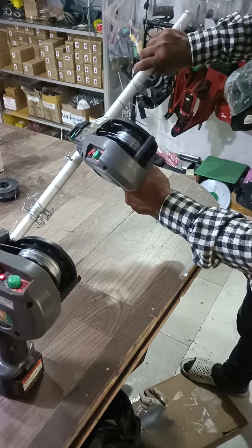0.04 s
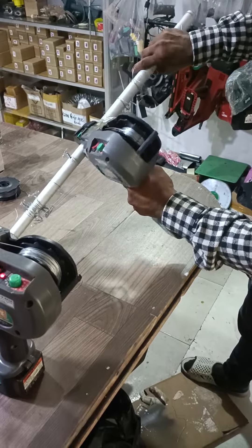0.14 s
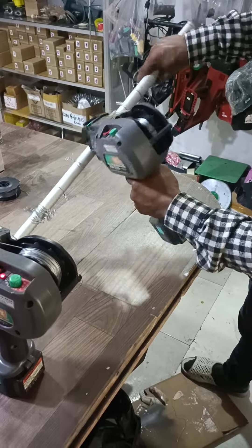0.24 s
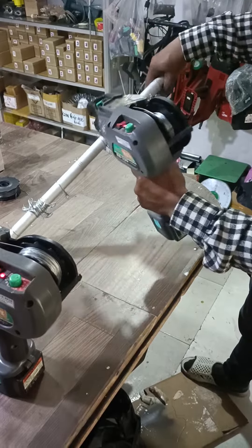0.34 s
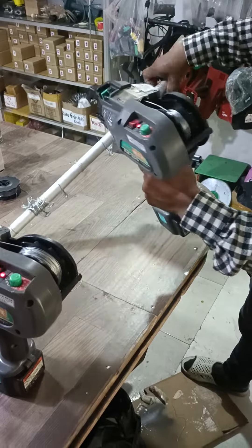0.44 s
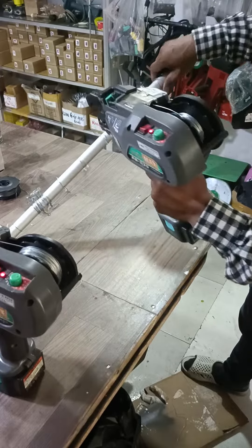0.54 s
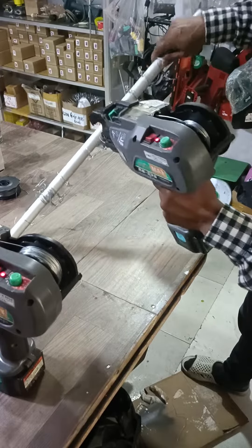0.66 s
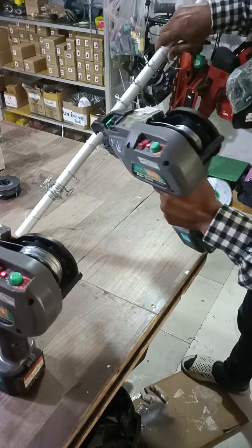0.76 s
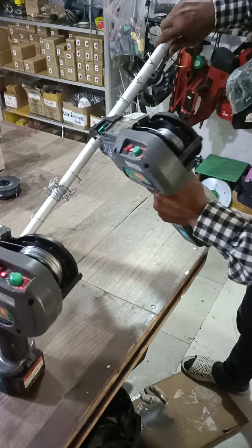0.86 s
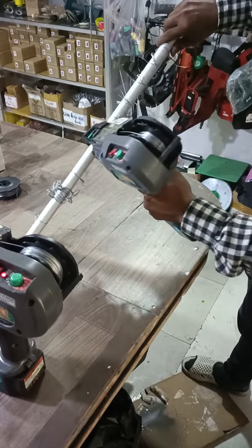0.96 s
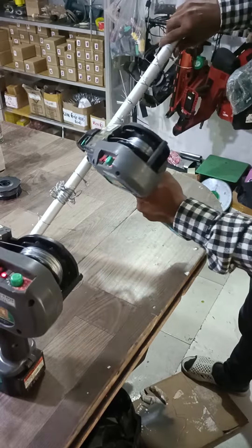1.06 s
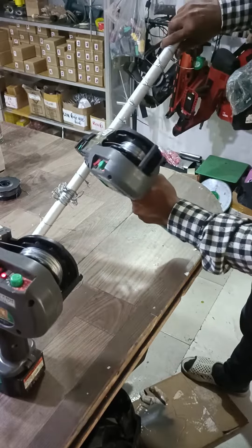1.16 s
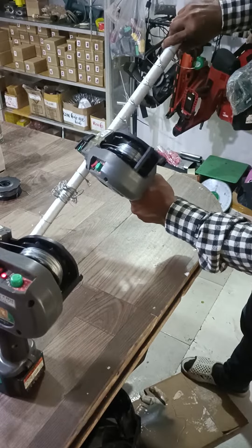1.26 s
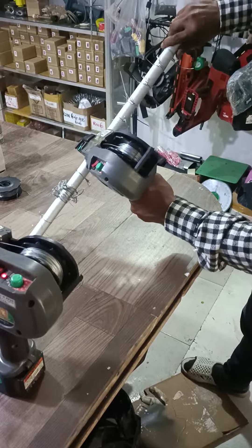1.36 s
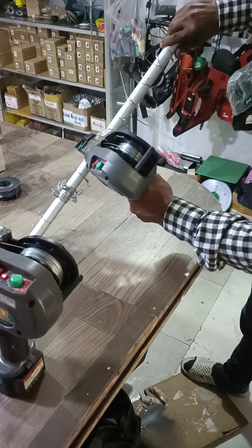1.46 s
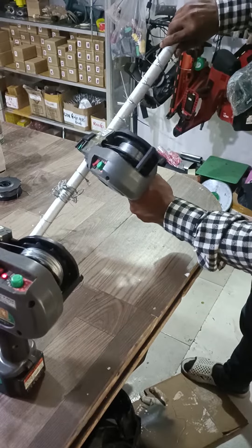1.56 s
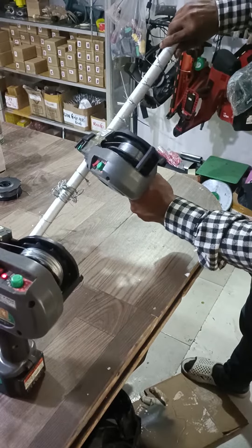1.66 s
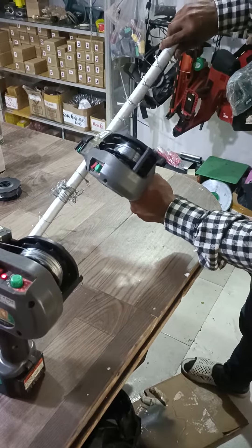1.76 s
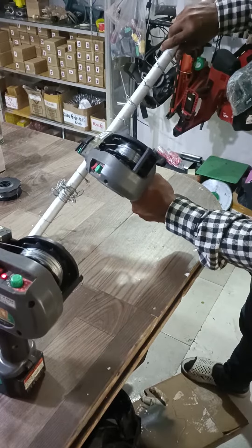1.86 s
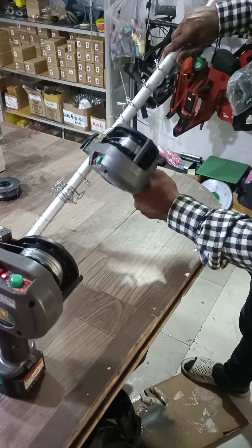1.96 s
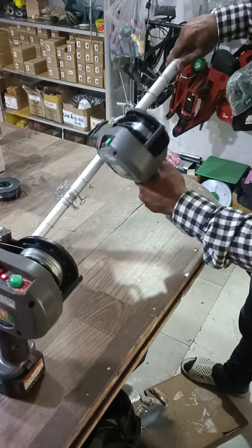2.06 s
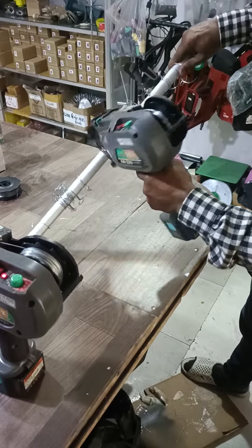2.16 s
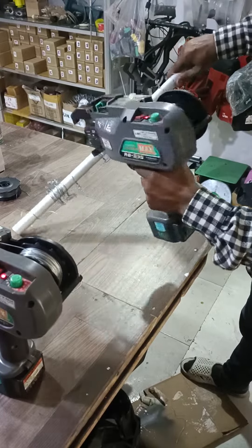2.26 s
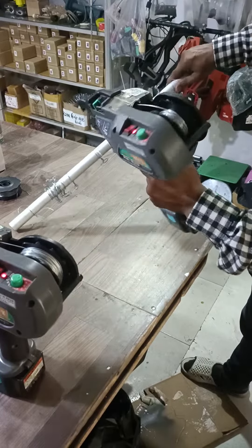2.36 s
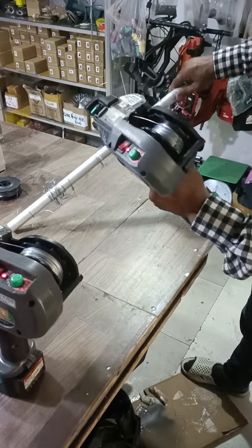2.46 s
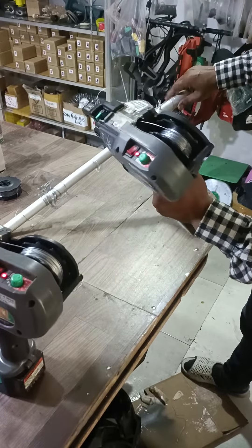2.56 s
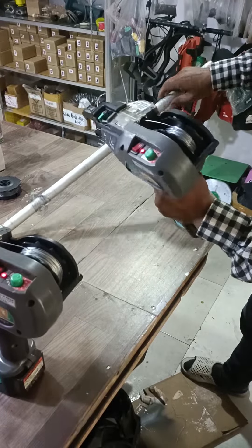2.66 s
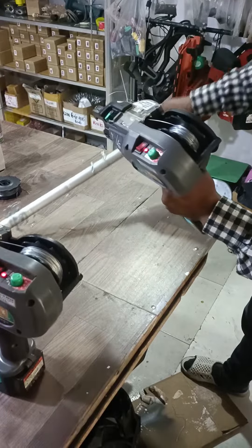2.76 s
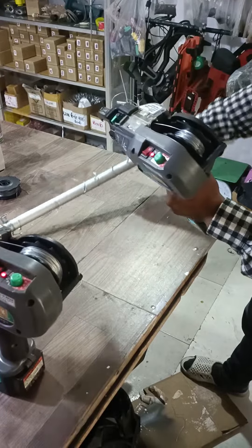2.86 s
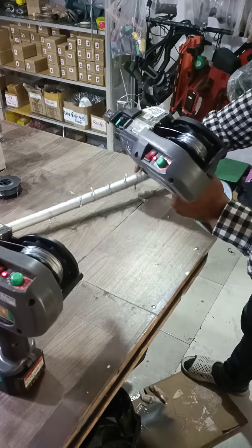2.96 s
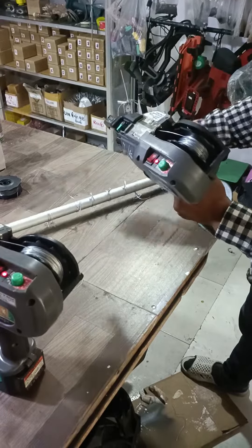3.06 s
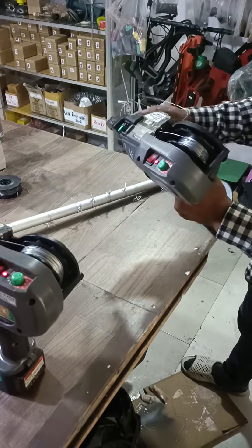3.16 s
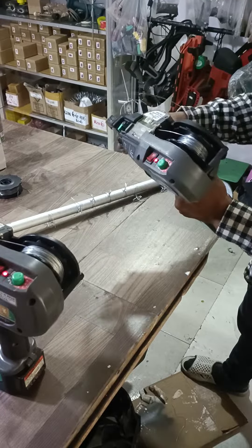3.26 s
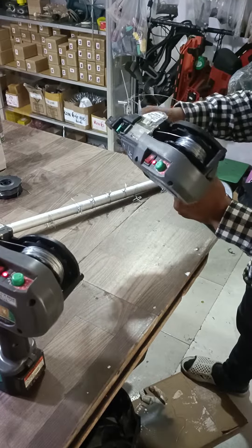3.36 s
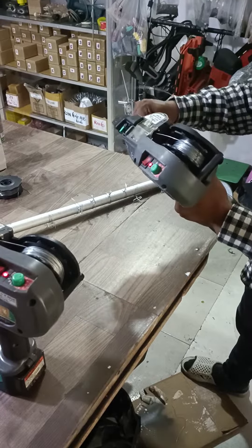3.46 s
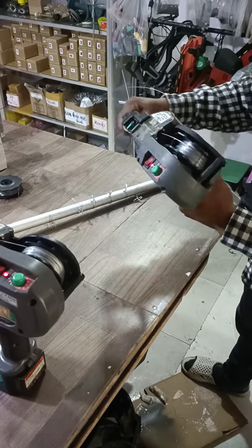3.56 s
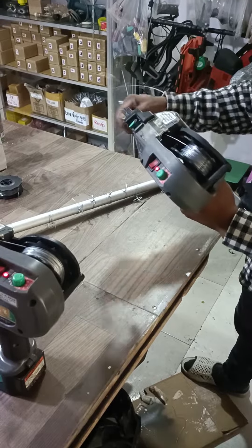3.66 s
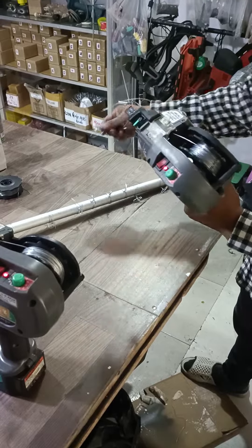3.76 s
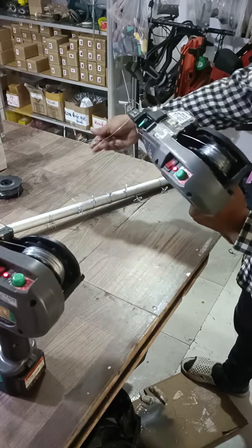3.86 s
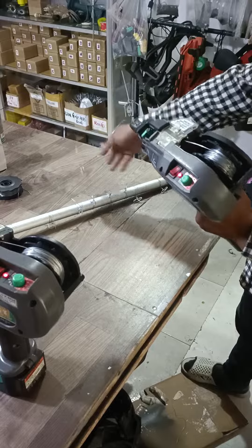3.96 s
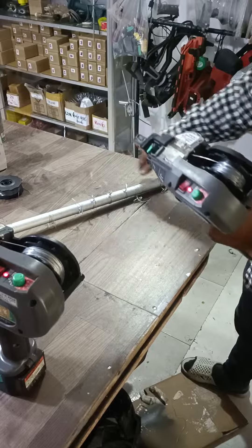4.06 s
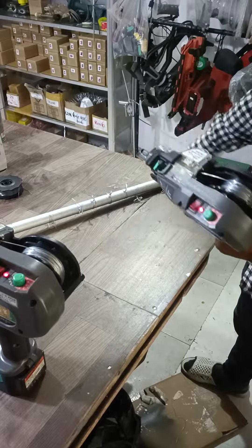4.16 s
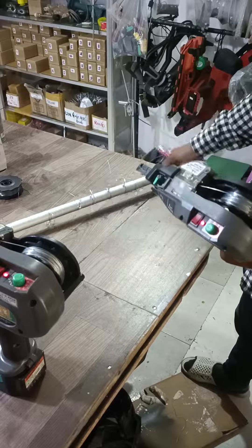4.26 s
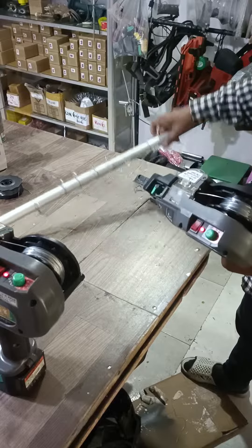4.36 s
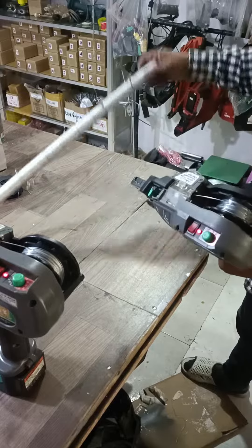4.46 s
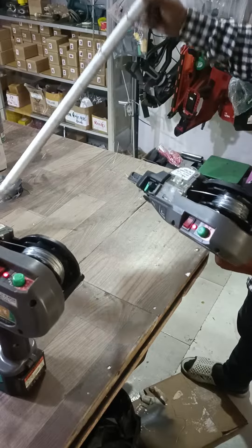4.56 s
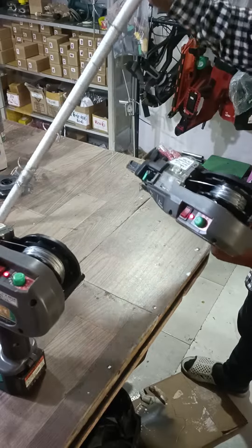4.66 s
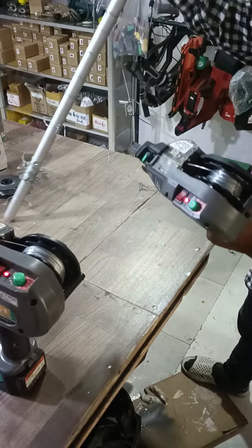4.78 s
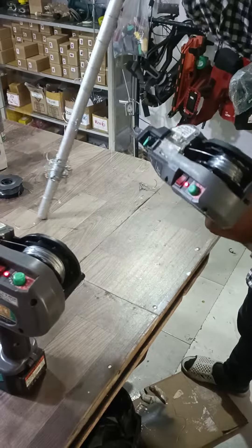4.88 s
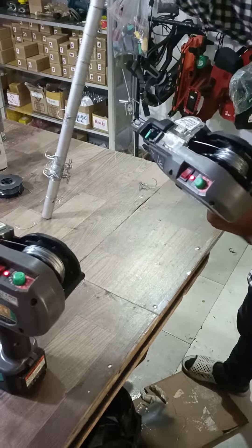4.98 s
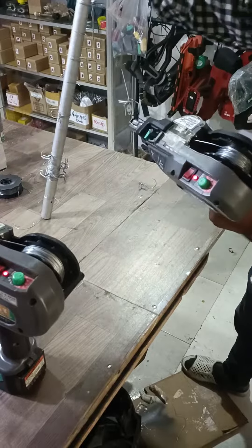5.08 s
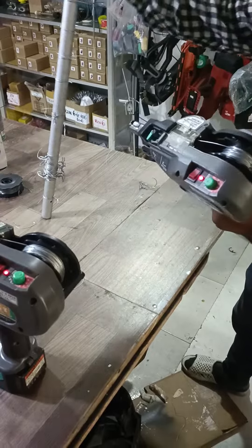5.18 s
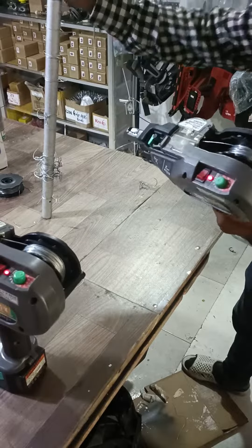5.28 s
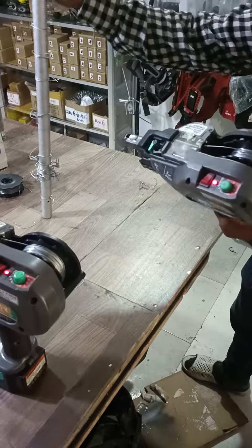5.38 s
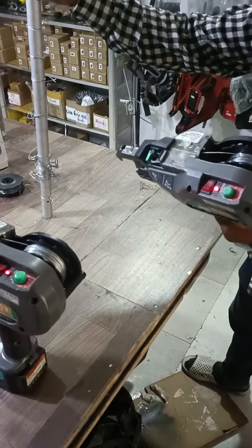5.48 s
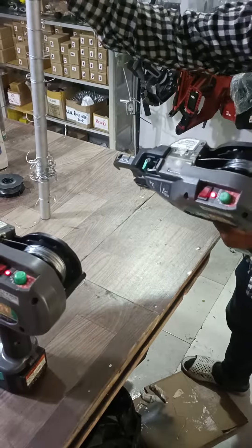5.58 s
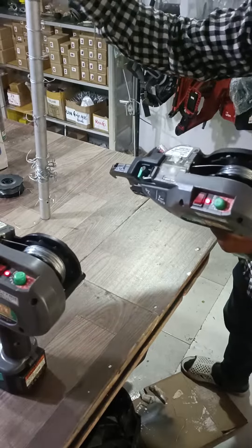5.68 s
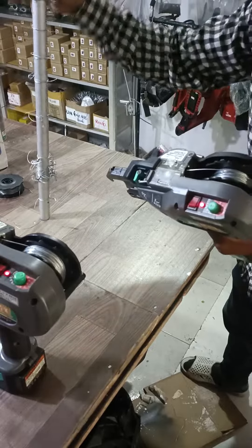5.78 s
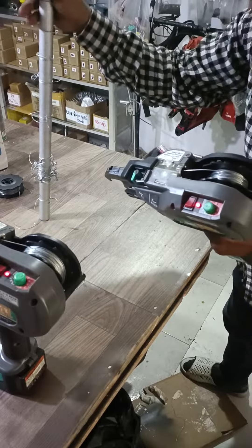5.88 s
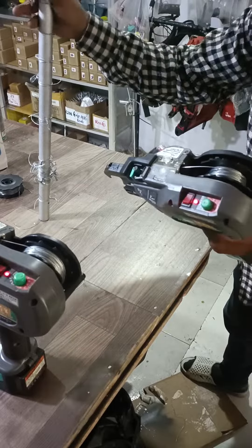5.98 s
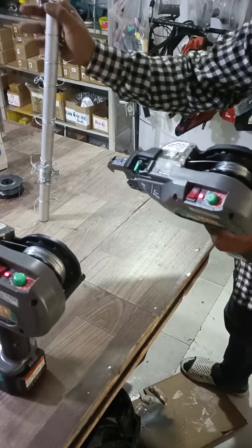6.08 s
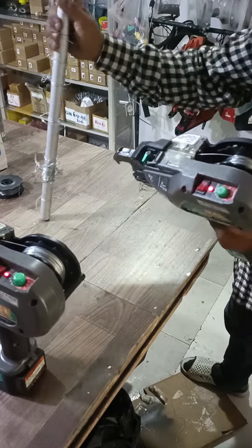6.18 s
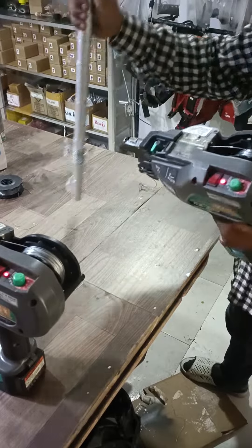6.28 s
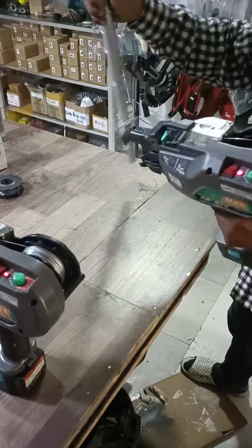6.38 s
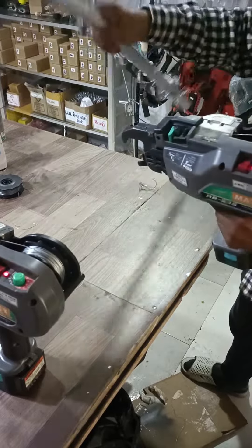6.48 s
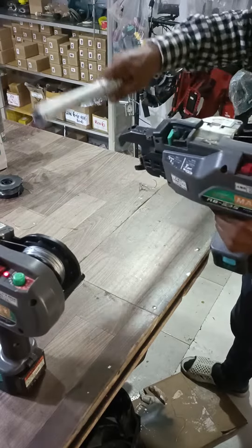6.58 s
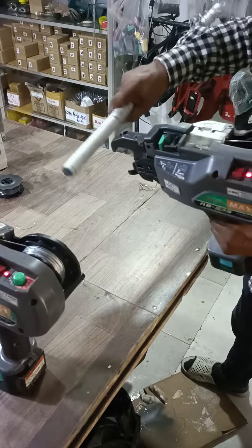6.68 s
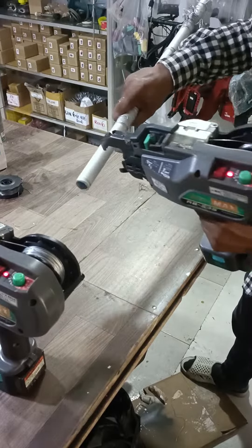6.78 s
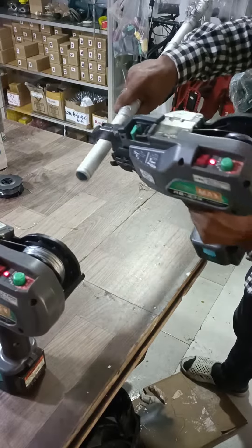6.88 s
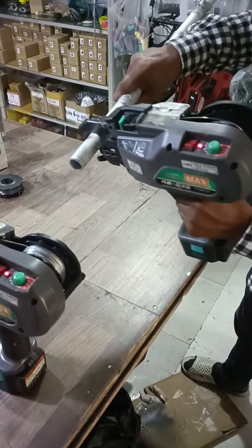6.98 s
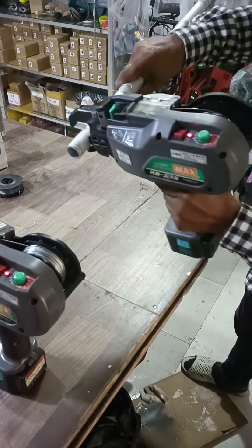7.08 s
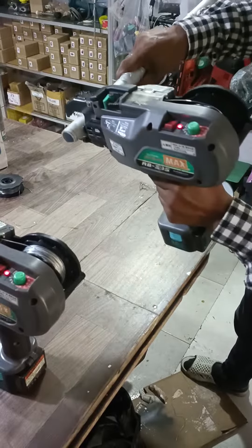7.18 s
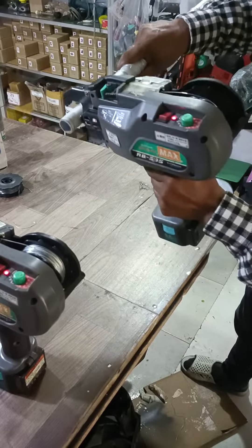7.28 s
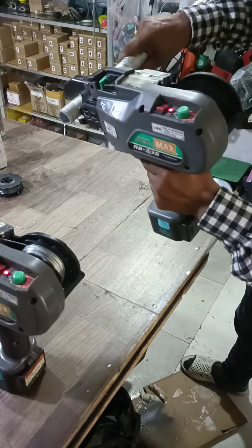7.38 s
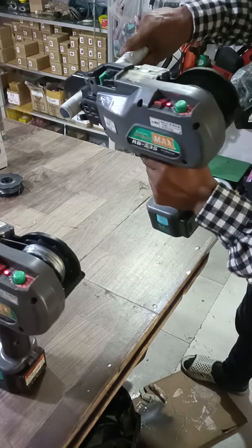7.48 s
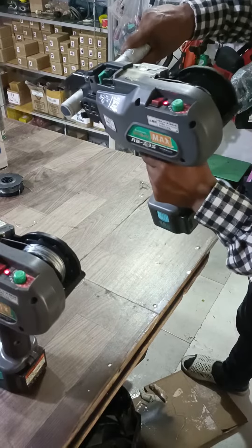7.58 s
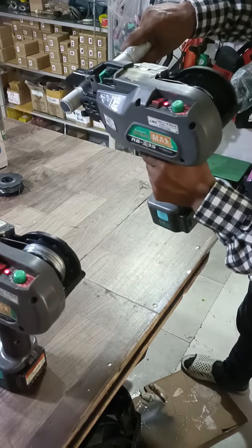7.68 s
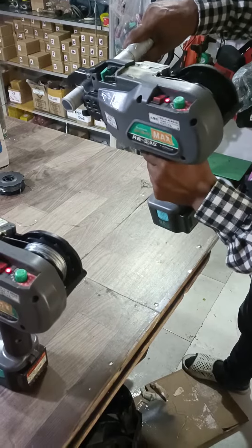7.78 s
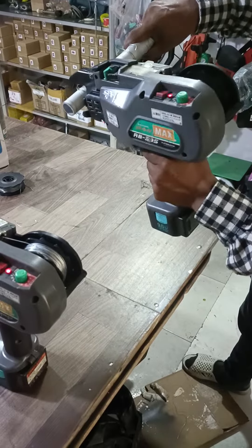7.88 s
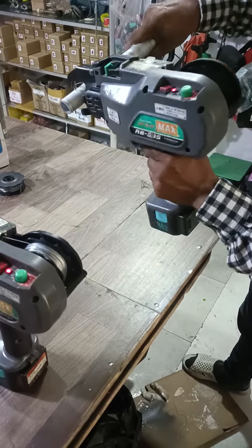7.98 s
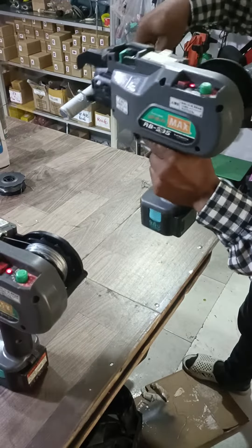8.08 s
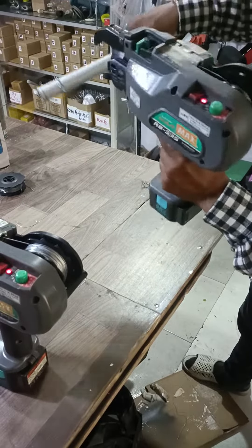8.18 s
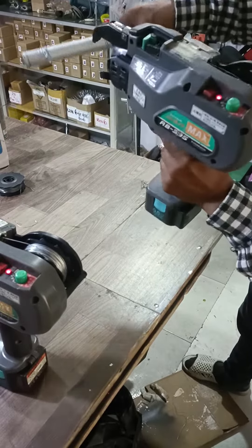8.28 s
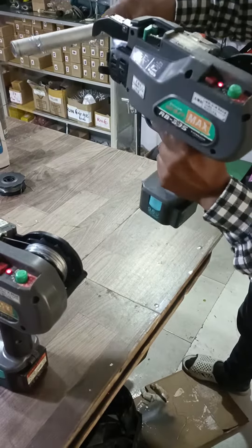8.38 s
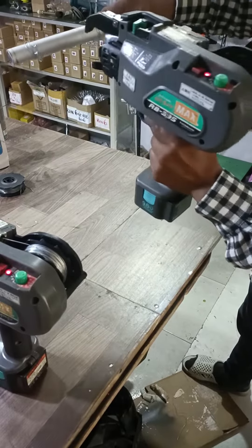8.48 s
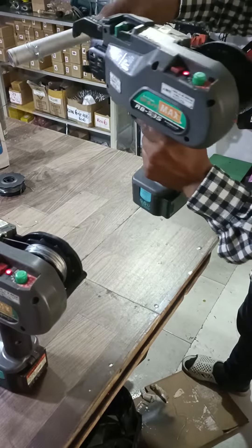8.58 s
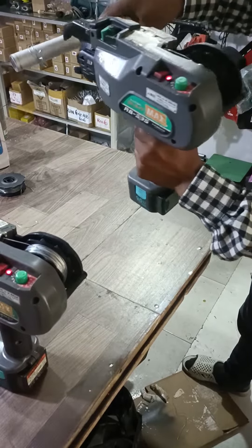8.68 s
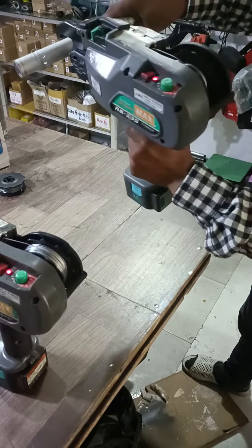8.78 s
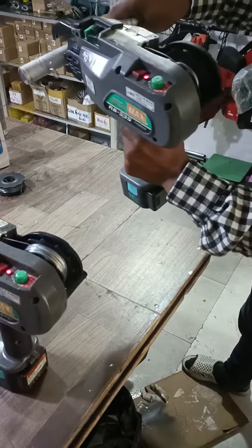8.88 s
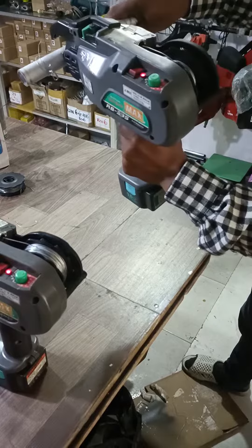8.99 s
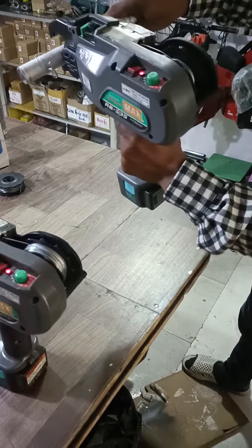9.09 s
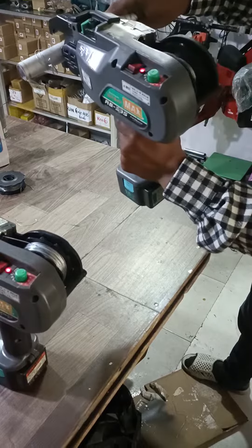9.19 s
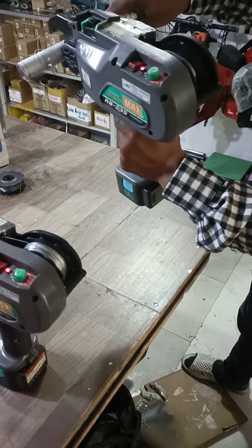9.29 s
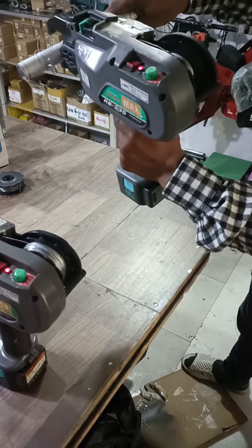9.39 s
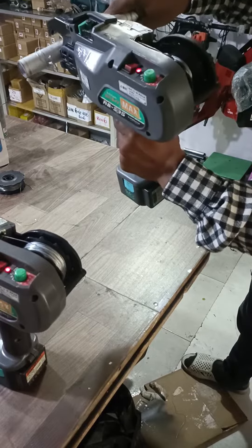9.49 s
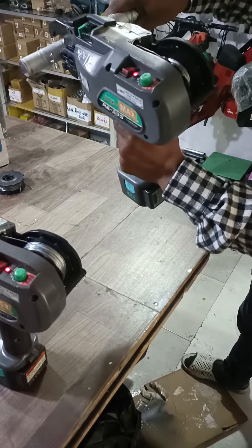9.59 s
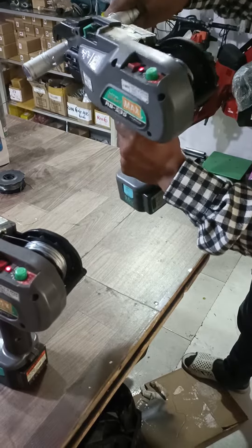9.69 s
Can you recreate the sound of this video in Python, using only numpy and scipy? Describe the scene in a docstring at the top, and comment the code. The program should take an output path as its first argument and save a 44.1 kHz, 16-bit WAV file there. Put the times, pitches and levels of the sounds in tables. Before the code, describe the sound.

A cordless wire tying tool is already running close by: a clattering gear whirr, a cutter snap and a twisting rattle that stops at about 0.6 seconds. A clack follows at 1.3, then a second burst from 1.6 to 2.3, ending with a clack and a knock. A plastic pipe scrapes softly, then drops and bounces on a wooden bench around 3.1 with a low boom. Wire scrapes and the jaws click near 3.7. From 4.1 to 5 the pipe ticks, knocks and drags with a faint falling groan. Its wire ties rustle and jingle until 6.2. The steel jaw clinks brightly at 7. A third burst runs from 7.4 to 8.2 with a thin, high whine. After a clack at 9, a similar burst runs from 9.3 to about 10. The small room hums softly throughout.

```python
"""In a small, humming stock room, a cordless rebar tier binds wire round a plastic pipe over a wooden bench.
In each cycle the gears whirr and clatter as wire is fed, the cutter snaps, and the hook twists with a
slower rattle. Between cycles the jaws click, and the pipe is dropped, dragged and stood up.
Its knocks make the bench boom and its wire ties jingle."""
import sys
import numpy as np
from scipy import signal
from scipy.fft import rfft, irfft
from scipy.io import wavfile
from scipy.ndimage import uniform_filter1d

SR = 44100
rng = np.random.default_rng(int(sys.argv[2]) if len(sys.argv) > 2 else 0)


def master(y):
    """Save y as 16-bit WAV."""
    cut = np.clip(np.atleast_2d(y).T, -1, 1)
    pcm = np.round(cut * 32767)  # scale
    wavfile.write(sys.argv[1], SR, pcm.astype(np.int16))


N = 429534
TIME = np.arange(N) / SR


def undb(db):
    """Turn decibels into a gain to multiply by."""
    return 10 ** (np.asarray(db) / 20)


def unit(x):
    """Scale a sound to an average strength (rms) of 1."""
    return x / np.sqrt(np.mean(x ** 2) + 1e-20)


def add(out, s, x):
    """Mix x into out, starting at s seconds."""
    i = max(int(s * SR), 0)
    out[i:i + len(x)] += x[:max(N - i, 0)]


def ramp(from_s, length_s):
    """Rise from 0 to 1, starting at a given time."""
    return np.clip((TIME - from_s) / length_s, 0, 1)


def band(x, lo_hz, hi_hz, order=2):
    """Keep the part of a sound between two frequencies."""
    sos = signal.butter(order, [lo_hz, min(hi_hz, SR / 2 - 1)], "band", fs=SR, output="sos")
    return signal.sosfilt(sos, x + 1e-18)


def colour(x, points, size=4096):
    """Shape the tone along a curve of (f/Hz, level/dB) points."""
    hz, db = np.transpose(points)
    grid_hz = np.arange(size // 2 + 1) * SR / size + 1
    curve_db = np.interp(np.log(grid_hz), np.log(hz), db)
    cepstrum = irfft(np.log(undb(curve_db)))
    cepstrum[1:size // 2] *= 2  # folded so that nothing rings ahead of a hit
    cepstrum[size // 2 + 1:] = 0
    return signal.oaconvolve(x, irfft(np.exp(rfft(cepstrum))))[:len(x)]


def resonate(x, peaks):
    """Boost the (f/Hz, width/Hz, level/dB) bands where an object likes to ring."""
    return x + sum(undb(db) * band(x, hz - width / 2, hz + width / 2, order=1) for hz, width, db in peaks)


def ring(modes, size=SR // 2):
    """A struck object's notes, a little different each time; each fades by 60 dB in its ring time."""
    t = np.arange(size) / SR
    return sum(undb(db + rng.normal()) * rng.choice([-1, 1]) * np.sin(2 * np.pi * hz * t)
               * np.exp(-np.log(1000) * t / ring_s) for hz, db, ring_s in modes)


def crack(decay_s, rattle_db, rattle_s, size=SR // 2):
    """A hard contact followed by a short rattle of loose parts."""
    t = np.arange(size) / SR
    return rng.standard_normal(size) * (np.exp(-t / decay_s) + undb(rattle_db) * np.exp(-t / rattle_s))


def blow(x, levels_db, size=SR // 50):
    """Give the first moments of a hit their bass, middle and treble levels."""
    parts = [band(x, lo, hi, order=3) for lo, hi in [(110, 800), (800, 5000), (5000, 21000)]]
    return sum(part * undb(db) / np.std(part[:size]) for part, db in zip(parts, levels_db))


def grit(per_s, spread_db):
    """Tiny contacts of uneven size at random moments."""
    contacts = rng.random(N) < per_s / SR
    return unit(contacts * rng.standard_normal(N) * undb(spread_db * rng.standard_normal(N)))


def swell(stroke, depth_db=15.5):
    """One rubbing stroke grows to its peak and dies away."""
    start, rise_s, fall_s, db = stroke
    off_peak = 1 - ramp(start, rise_s) + ramp(start + rise_s, fall_s)
    return uniform_filter1d(undb(db - depth_db * off_peak ** 2) * (off_peak < 1), 128)


def scrape(strokes, tone, per_s, gain_db, flutter_db):
    """Two surfaces stick and slip unevenly, in grains that take on the rubbed object's tone."""
    catching = undb(flutter_db * unit(band(rng.standard_normal(N), 7.8, 60)))
    grains = unit(colour(grit(per_s, spread_db=2.4) * catching, tone))
    return grains * undb(gain_db) * sum(map(swell, strokes))


def glides(notes, width_hz):
    """Steady rubbing sings rough, sliding notes."""
    out = np.zeros(N)
    for start, end, from_hz, to_hz, db in notes:
        n = max(int((end - start) * SR), 100)
        noise = rng.standard_normal(n) + 1j * rng.standard_normal(n)
        rough = signal.lfilter(*signal.butter(2, width_hz, fs=SR), noise)
        note = np.real(rough * np.exp(2j * np.pi * np.cumsum(np.linspace(from_hz, to_hz, n)) / SR))
        add(out, start, unit(note) * signal.windows.tukey(n, .5) * undb(db))
    return out


def place(x, lag, pan_db):
    """Make a left and right pair: the right is lag samples later and pan_db quieter."""
    return np.array([x * undb(pan_db / 2), np.roll(x, lag) * undb(-pan_db / 2)])


# tone of the room's rumble: f/Hz, level/dB
RUMBLE_TONE = [(15, -61), (25, -26.5), (69, -20.5), (109, -7), (191, -11), (224, -10), (278, -8.5),
               (318, -5.5), (501, -17.5), (769, -14), (856, -14), (927, -19), (1810, -25.5), (2300, -28),
               (15000, -52.5)]
# how loud the hum is over time: t/s, level/dB
HUM_LEVELS = [(0, -61), (1.4, -66.5), (2.8, -54.5), (5.7, -53), (8.6, -76)]
def background(rumble_db=-52.5):
    """The room rumbles softly, with a wavering hum in two low bands."""
    rumble = np.array([unit(colour(rng.standard_normal(N), RUMBLE_TONE)) for _ in range(2)])
    hum = sum(undb(db) * unit(band(rng.standard_normal(N), hz - width / 2, hz + width / 2))
              for hz, width, db in [(118, 30, 0), (195, 70, -3)])
    return rumble * undb(rumble_db) + hum * undb(np.interp(TIME, *np.transpose(HUM_LEVELS)))


# how long the room rings: f/Hz, ring time/s
ROOM_RING = [(150, 0.01), (500, 0.42), (1500, 0.3744), (4000, 0.4627), (9000, 0.35), (15000, 0.44)]
def room(x, early_db=-5, early_s=.0031, tail_db=-4, build_s=.0026, size=SR * 3 // 4):
    """Sound bounces quickly off the bench, then scatters among the shelves into a fading tail."""
    t = np.arange(size) / SR
    edges_hz = np.geomspace(60, 20000, 9)
    tail = np.zeros(size)
    for lo, hi in zip(edges_hz, edges_hz[1:]):
        ring_s = np.interp(np.sqrt(lo * hi), *np.transpose(ROOM_RING))
        tail += band(rng.standard_normal(size), lo, hi) * np.exp(-np.log(1000) * t / ring_s)
    tail *= 1 - np.exp(-t / build_s)
    early = rng.standard_normal(size) * (rng.random(size) < .15) * np.exp(-t / early_s)
    echoes = (undb(early_db) * unit(early) + undb(tail_db) * unit(tail)) / np.sqrt(size)
    return signal.oaconvolve(x, echoes)[:N]


REBOUND_S = .0095  # a tick or knock touches again, more weakly, this much later
# ticks of the wire ties: t/s, peak level/dB
TIE_TICKS = [(1.0484, -35), (3.4212, -35), (4.1133, -30.5), (4.19, -28.5), (4.2632, -25), (4.279, -27),
             (4.5965, -27.5), (5.245, -29.5), (5.9407, -21), (6.0813, -32), (6.1572, -17)]
# ties rubbing on the pipe: start/s, rise/s, fall/s, level/dB
TIE_RUBS = [(1.086, 0.017, .04, -50), (3.418, .014, .01, -45), (5.243, .07, .075, -34),
            (5.708, .008, 0.043, -49), (5.845, .03, 0.069, -51), (5.937, 0.021, 0.031, -41.5),
            (6.143, 0.012, .018, -36), (6.16, .02, 0.046, -48)]
# tone of the thin wire: f/Hz, level/dB
TIE_TONE = [(880, -60), (1500, -15.5), (1620, -17), (2080, -23.5), (2360, -14), (3270, -19.5), (3680, -2.5),
            (4100, -23.5), (4700, -3), (5350, -11.5), (6080, -3.5), (9470, -2.5), (15800, -18)]
def wire_ties(tick_db=-2, rebound_db=-8, rub_db=-2):
    """Loose wire ties tick, bounce and rub on the pipe."""
    ticks = np.zeros(N)
    for s, db in TIE_TICKS:
        for late_s, contact_db in [(0, tick_db), (REBOUND_S, rebound_db)]:
            tick = colour(crack(decay_s=.0017, rattle_db=-17.5, rattle_s=.011), TIE_TONE)
            add(ticks, s + late_s, tick / np.abs(tick).max() * undb(db + contact_db))
    rubbing = unit(colour(grit(per_s=2200, spread_db=2.5), TIE_TONE))
    return ticks + rubbing * undb(rub_db) * sum(map(swell, TIE_RUBS))


def tie_jingle(pipe, ring_hz=8520, width_hz=400, gain_db=-44, fade_s=.04):
    """Whatever shakes the pipe sets its wire ties ringing high; their slack limits how hard."""
    keep = np.exp(-1 / (fade_s * SR))
    shaking = np.sqrt(signal.lfilter([1 - keep], [1, -keep], np.abs(pipe)))
    ringing = unit(band(rng.standard_normal(N), ring_hz - width_hz / 2, ring_hz + width_hz / 2))
    return ringing * shaking * undb(gain_db)


# drags along the bench: start/s, rise/s, fall/s, level/dB
PIPE_DRAGS = [(2.72, .12, 0.11, -45), (2.968, 0.0089, 0.011, -47), (4.56, 0.11, .13, -39.5),
              (4.925, .01, 0.064, -39)]
# tone of plastic on wood: f/Hz, level/dB
DRAG_TONE = [(120, -27), (220, 0.5), (450, -8), (800, -9), (1500, -4.5), (2500, -8.5), (4200, -10.5),
             (7500, -16), (15000, -32)]
# where the dragged pipe rings: f/Hz, width/Hz, level/dB
DRAG_PEAKS = [(787, 43, -1), (1150, 87, -11), (1540, 150, -2), (2450, 240, 5.5), (3560, 120, 5)]
def pipe_drag():
    """The pipe scrapes over the wood, which makes it ring."""
    return resonate(scrape(PIPE_DRAGS, DRAG_TONE, per_s=2400, gain_db=-2, flutter_db=1.5), DRAG_PEAKS)


# groans of the pipe: start/s, end/s, first f/Hz, last f/Hz, level/dB
PIPE_GROANS = [(4.63, 4.74, 2410, 1704, -50), (4.69, 4.81, 1150, 598, -43)]
def pipe_groan():
    """The dragged pipe groans lower as it tips upright."""
    return glides(PIPE_GROANS, width_hz=220)


# knocks on the bench: t/s, bass/dB, middle/dB, treble/dB
PIPE_KNOCKS = [(2.273, -26, -21, -27), (3.0964, -16, -15, -31.5), (3.204, -23, -27.5, -43),
               (4.243, -47, -55, -56), (4.433, -31.5, -37.5, -49), (4.921, -38.5, -35, -42)]
# tone of a knock: f/Hz, level/dB
KNOCK_TONE = [(60, -18.5), (220, -7), (350, -10), (490, 2.5), (780, -11), (880, -12.5), (1050, -7),
              (1500, -16.5), (2300, -13.5), (5400, -27.5), (8400, -32), (15800, -40.5)]
# notes of the struck pipe and bench: f/Hz, level/dB, ring time/s
KNOCK_NOTES = [(170, -8, 0.22), (231, -1.5, 0.39), (415, -5, .12), (468, 1, 0.12), (585, -2, .14),
               (766, -5, 0.14), (1060, -4, 0.22), (1150, -5.5, 0.21), (1245, -4.5, 0.11), (1605, -13, .12),
               (2120, -12, 0.24), (2295, -11.5, 0.32), (2650, -11, 0.28)]
def pipe_knocks(ring_db=-8, first_db=(-1, -1, 0), rebound_db=(-7, -16, -3)):
    """The pipe hits the bench and bounces, and both ring."""
    out = np.zeros(N)
    for s, *levels in PIPE_KNOCKS:
        for late_s, contact_db in [(0, first_db), (REBOUND_S, rebound_db)]:
            contact = unit(colour(crack(decay_s=.0021, rattle_db=-12.5, rattle_s=.022), KNOCK_TONE))
            knock = contact + undb(ring_db) * unit(ring(KNOCK_NOTES))
            add(out, s + late_s, blow(knock, np.add(levels, contact_db)))
    return out


# booms of the bench top: t/s, level/dB
BENCH_BOOMS = [(0.552, -39), (1.285, -38.5), (2.276, -33.5), (3.098, -35.5), (3.204, -38.5), (4.436, -31.5),
               (4.921, -46)]
# its low notes: f/Hz, level/dB, ring time/s
BENCH_NOTES = [(76, -8, 0.17), (90, 0, .22), (99, 6.5, 0.25), (124, -7.5, 0.24)]
def bench_booms(rise_s=.016):
    """The heavy bench top is slow to start booming after a hit."""
    out = np.zeros(N)
    for s, db in BENCH_BOOMS:
        boom = ring(BENCH_NOTES)
        add(out, s, undb(db) * boom * (1 - np.exp(-TIME[:len(boom)] / rise_s)))
    return out


# slides of the wire: start/s, rise/s, fall/s, level/dB
WIRE_SLIDES = [(1.24, .033, .005, -45), (3.585, .075, .014, -28), (4.135, 0.0052, 0.042, -37),
               (4.26, .02, 0.03, -40)]
# tone of the sliding wire: f/Hz, level/dB
SLIDE_TONE = [(410, -61.5), (700, -23), (1180, -20), (1630, -10), (2580, -10.5), (3260, -10), (4120, -5.5),
              (6260, -5), (7810, -16.5), (10500, -15.5), (15800, -17)]
def wire_slides():
    """Wire slides in the tool's jaws with a fine scrape."""
    return scrape(WIRE_SLIDES, SLIDE_TONE, per_s=8100, gain_db=-1, flutter_db=2)


# taps of the jaw: t/s, level/dB
JAW_HITS = [(7.0235, -15.5)]
# notes of the jaw: f/Hz, level/dB, ring time/s
JAW_NOTES = [(1600, -12.5, 0.1), (1730, -10.5, .035), (2105, -8, 0.03), (3305, -0.5, 0.098),
             (3370, -11.5, 0.13), (8500, -26.5, 0.26)]
def jaw_ring(contact_db=-5):
    """The steel jaw rings when it meets the pipe."""
    out = np.zeros(N)
    for s, db in JAW_HITS:
        contact = band(crack(decay_s=.0025, rattle_db=-12, rattle_s=.012), 1400, 9000, order=1)
        add(out, s, undb(db) * (ring(JAW_NOTES) + undb(contact_db) * contact))
    return out


SWITCH_S = .012  # the drive fades in or out over this time
CURL_AFTER_S, SPEED_UP_S = .2, .17  # after the trigger, the wire curls round the jaws and the feed speeds up
# tying cycles: trigger/s, wire caught/s, feed ends/s, cut/s, twist ends/s, feed rate/Hz, twist rate/Hz,
# twist slowing/(Hz per s), feed level/dB, twist level/dB, tool turned side-on/(0 or 1)
TYING_CYCLES = [(-.235, -.185, .215, .3, .568, 80, 88, 120, -19.5, -25, 0),
                (1.582, 1.632, 2.028, 2.145, 2.335, 77, 120, 85, -20, -20, 0),
                (7.399, 7.42, 7.887, 7.95, 8.182, 77.5, 88, 55, -20, -24, 1),
                (9.241, 9.289, 9.745, 9.8, 10.03, 85, 88, 55, -20, -24, 1)]
def running_cycle():
    """The columns of the cycle under way at each moment; it takes over just before its trigger."""
    rows = np.array(TYING_CYCLES)
    return rows[np.searchsorted(rows[1:, 0] - SWITCH_S, TIME)].T


def recoil(thump_db=-46, side_on_db=-12, decay_s=.012):
    """Each cut jolts the whole tool with a dull thump, weaker when it is side-on."""
    out = np.zeros(N)
    t = TIME[:SR // 10]
    for _, _, _, cut, *_, side_on in TYING_CYCLES:
        thump = unit(band(rng.standard_normal(len(t)) * np.exp(-t / decay_s), 55, 230))
        add(out, cut, thump * undb(thump_db + side_on_db * side_on))
    return out


# clacks of the jaws: t/s, bass/dB, middle/dB, treble/dB, rattle/dB
JAW_CLACKS = [(.496, -52, -22, -22, -30), (1.2764, -37, -27, -34.5, -23), (1.424, -62, -47, -54, -28),
              (2.291, -33, -21, -19, -23), (3.553, -57.5, -43, -50, -26), (3.675, -38, -20.5, -24, -18),
              (4.13, -58, -35.5, -36.5, -31), (7.119, -45, -23, -30.5, -23), (8.982, -38, -25.5, -37, -22)]
# the cutter's snap: bass/dB, middle/dB, treble/dB, rattle/dB
CUTTER_SNAP = (-40, -23, -21, -23.5)
# tone of both: f/Hz, level/dB
SNAP_TONE = [(100, -12), (280, -12), (460, -6.5), (800, -8.5), (1400, -2.5), (2300, -0.5), (3400, 1.5),
             (5000, -3.5), (7000, -11), (9500, -12.5), (13000, -11.5), (15800, -20)]
def snaps(lift_db=(0, 1, 1)):
    """The jaws clack on pipe and wire, and the cutter snaps once a cycle."""
    out = np.zeros(N)
    cuts = [(cut, *CUTTER_SNAP) for _, _, _, cut, *_ in TYING_CYCLES]
    for s, *levels, rattle_db in JAW_CLACKS + cuts:
        snap = colour(crack(decay_s=.0039, rattle_db=rattle_db, rattle_s=.016), SNAP_TONE)
        add(out, s, blow(snap, np.add(levels, lift_db)))
    return out


# the wire's whines, timed from the trigger: start/s, end/s, first f/Hz, last f/Hz, level/dB
WIRE_WHINES = [(.07, .205, 4480, 4820, -39), (.39, .46, 4150, 3920, -37), (.45, .515, 3950, 3600, -33.5)]
# its growl, timed the same way: start/s, end/s, first f/Hz, last f/Hz, level/dB
WIRE_GROWLS = [(0.003, .22, 1298, 1443, -31)]
def wire_notes(side_whine_db=14, side_growl_db=-12):
    """The wire growls, and whines up then down, in its guide; side-on, more whine and less growl."""
    notes = []
    for trigger, *_, side_on in TYING_CYCLES:
        for table, side_db in [(WIRE_WHINES, side_whine_db), (WIRE_GROWLS, side_growl_db)]:
            notes += [(trigger + start, trigger + end, from_hz, to_hz, db + side_db * side_on)
                      for start, end, from_hz, to_hz, db in table if trigger + start > 0]
    return glides(notes, width_hz=55)


def drive(full_hz=158.1, coast_s=.14, idle_db=-9, slow_db=6, fast_db=-2, coast_db=-6, twist_db=2):
    """The feed speeds up and coasts; the hook slows as the wire tightens. Levels are strikes over whirr."""
    trigger, caught, fed, cut, _, feed_hz, twist_hz, sag_hz_per_s, *_ = running_cycle()
    speed = ramp(trigger + CURL_AFTER_S, SPEED_UP_S)
    feeding_hz = (feed_hz + (full_hz - feed_hz) * speed) * np.exp(-np.maximum(TIME - fed, 0) / coast_s)
    twisting_hz = np.maximum(twist_hz - sag_hz_per_s * (TIME - cut), twist_hz / 2)
    hz = np.where(TIME < cut, feeding_hz, twisting_hz)
    stages = [TIME < caught - SWITCH_S / 2, TIME < fed, TIME < cut]
    strike_db = np.select(stages, [idle_db, slow_db + (fast_db - slow_db) * speed, coast_db], twist_db)
    limping = (TIME < cut) * (1 - speed)
    return hz, strike_db, limping


def tooth_times(hz):
    """When each gear tooth strikes, and which of a pair it is; teeth engage afresh at catch and cut."""
    passed = np.cumsum(hz) / SR
    times, sides = [], []
    for _, caught, _, cut, stop, *_ in TYING_CYCLES:
        for span in [(caught, cut), (cut, stop)]:
            teeth = np.arange(*np.interp(span, TIME, passed))
            times.extend(np.interp(teeth, passed, TIME))
            sides.extend((-1) ** np.arange(len(teeth)))
    return np.array(times), np.array(sides)


def clatter(strike_s=.0014, scatter_db=2, jitter=.04, limp=.1, shared=.4):
    """Teeth strike at the drive's speed, in uneven pairs, over the fine whirr of the gears."""
    hz, strike_db, limping = drive()
    s, side = tooth_times(hz)
    timing, strength = rng.standard_normal((N // 1000, 2))[:len(s)].T
    late_s = (limp * np.interp(s, TIME, limping) * (side - 1) + jitter * timing) / np.interp(s, TIME, hz)
    at = ((s + late_s) * SR).astype(int).clip(0, N - 1)
    blows = np.zeros(N)
    blows[at] = undb(scatter_db * strength) / np.sqrt(hz[at])
    fading = signal.lfilter([1], [1, -np.exp(-1 / (strike_s * SR))], blows)
    force = uniform_filter1d(fading, size=40) / np.sqrt(strike_s / 2)
    weight = undb(strike_db)
    # the casing sounds different in each direction, so left and right share only a part
    common, left, right = ((weight * force * rng.standard_normal(N) + grit(per_s=12000, spread_db=1.9))
                           / np.hypot(weight, 1) for _ in range(3))
    return np.sqrt(shared) * place(common, lag=8, pan_db=1.5) + np.sqrt(1 - shared) * np.array([left, right])


def spool_wander(x, depth_db=2.4, size=512):
    """As spool and wire move, the tone of the clatter wanders from moment to moment."""
    spectra = signal.stft(x, nperseg=size)[2]
    wander = uniform_filter1d(rng.standard_normal(spectra.shape[1:]), size=4, axis=0)  # smooth over pitch
    wander = uniform_filter1d(wander, size=5, axis=1)  # and over time
    return signal.istft(spectra * undb(depth_db * unit(wander)), nperseg=size)[1][:, :N]


def feed_load(curl_rise_s=.016, curl_fade_s=.17, coast_db_per_s=140.5):
    """The feed is soft and dull until the wire is caught, rumbles as it curls, and fades as it coasts."""
    trigger, caught, fed, cut, *_, feed_db, _, _ = running_cycle()
    curl_at = trigger + CURL_AFTER_S
    idle = 1 - ramp(caught - SWITCH_S, SWITCH_S / 2)
    curl = ramp(curl_at, curl_rise_s) * np.exp(-((TIME - curl_at) / curl_fade_s) ** 2)
    coasted_db = coast_db_per_s * np.clip(TIME - fed, 0, .07)
    level_db = feed_db - idle + ramp(curl_at, SPEED_UP_S) + 2.5 * curl - coasted_db
    running = ramp(trigger - SWITCH_S / 2, SWITCH_S) * (1 - ramp(cut, SWITCH_S))
    bass_db = -27.5 + 10 * curl + coasted_db
    treble_db = -2 - 10.5 * idle - 3.5 * curl
    return undb(level_db) * running, bass_db, treble_db


def twist_load(jolt_db=-18, jolt_s=.065, run_down_s=.06):
    """The hook starts with a jolt, rattles steadily, and loses its treble as it runs down."""
    _, _, _, cut, stop, *_, twist_db, _ = running_cycle()
    jolt = np.exp(-((TIME - cut) / jolt_s) ** 2)
    ending = ramp(stop - run_down_s, run_down_s)
    level_db = twist_db + (jolt_db - twist_db) * jolt
    running = ramp(cut, SWITCH_S) * (1 - ramp(stop, SWITCH_S / 2))
    bass_db = -31 + 12 * jolt + 10 * ending
    treble_db = -4 - 4 * jolt - 11 * ending
    return undb(level_db) * running, bass_db, treble_db


# where the tool's casing rings: f/Hz, width/Hz, level/dB
CASING_PEAKS = [(500, 120, -11), (1240, 340, -6.5), (1400, 220, -4), (2310, 220, -20.5), (3600, 800, -11),
                (7100, 600, -9.5), (10250, 460, -8.5), (11170, 550, -10.5), (14660, 900, -9.5)]
def casing(teeth, load, tone, gain_db=-1):
    """The clatter rings the casing; the load sets its loudness, bass and treble."""
    gain, bass_db, treble_db = load
    ringing = unit(band(resonate(colour(teeth, tone), CASING_PEAKS), 190, 20000, order=3))
    bass = signal.oaconvolve(ringing, signal.firwin(255, 800, fs=SR), "same")
    treble = ringing - signal.oaconvolve(ringing, signal.firwin(31, 8000, fs=SR), "same")
    middle = ringing - bass - treble
    return (middle + unit(bass) * undb(bass_db) + unit(treble) * undb(treble_db)) * undb(gain_db) * gain


# tone of the casing while wire is fed: f/Hz, level/dB
FEED_TONE = [(88, -58.5), (150, -35), (265, -14.5), (350, -24), (470, -12), (650, -11.5), (801, -6.5),
             (993, -8), (1410, -3.5), (2390, -.5), (2750, -5), (4630, 1), (8310, -6), (10100, -6),
             (15800, -8.5)]
# its tone while the hook twists: f/Hz, level/dB
TWIST_TONE = [(88, -57.5), (150, -26), (179, -26), (197, -36.5), (259, -31.5), (522, -16.5), (699, -16.5),
              (1250, -2.5), (1820, -2), (2340, 5), (2740, -2.5), (5310, 0), (8310, -5.5), (10500, -2),
              (15800, -5.5)]
def gears():
    """The gears first feed the wire and then turn the hook, heard through the casing."""
    feeding, twisting = feed_load(), twist_load()
    return np.array([casing(teeth, feeding, FEED_TONE) + casing(teeth, twisting, TWIST_TONE)
                     for teeth in spool_wander(clatter())])


def scene():
    """The tool close by, the pipe further along the bench, both in the room."""
    direct = gears()
    tool = wire_notes() + snaps() + jaw_ring() + recoil() + wire_slides()
    pipe = pipe_drag() + pipe_knocks() + bench_booms() + pipe_groan()
    direct += place(tool, lag=5, pan_db=2.5)
    direct += place(pipe + tie_jingle(pipe), lag=-4, pan_db=1)
    direct += place(wire_ties(), lag=-4, pan_db=2.5)
    return direct + np.array([room(x) for x in direct]) + background()


# stereo width, the gain on what left and right do not share: f/Hz, level/dB
STEREO_WIDTH = [(30, -5.5), (70, -11), (250, -11.5), (500, -4.5), (1100, 1), (16000, -0.5)]
def record(dry, ceiling=.85, top_hz=15850):
    """Draw the bass toward the centre, round off the peaks and cut the highest treble."""
    mid = (dry[0] + dry[1]) / 2
    side = colour((dry[0] - dry[1]) / 2, STEREO_WIDTH)
    stereo = np.array([mid + side, mid - side])
    rounded = stereo / (1 + (stereo / ceiling) ** 4) ** (1 / 4)
    return signal.sosfilt(signal.ellip(10, .2, 70, top_hz, fs=SR, output="sos"), rounded)


dry = scene()
out = record(dry)
master(out)
```